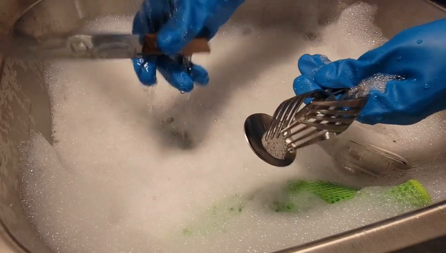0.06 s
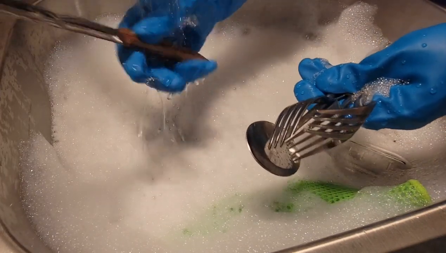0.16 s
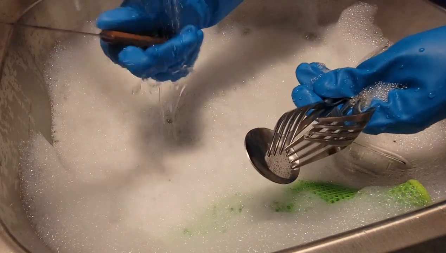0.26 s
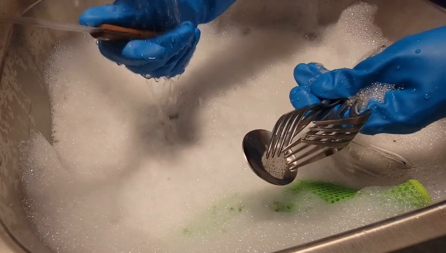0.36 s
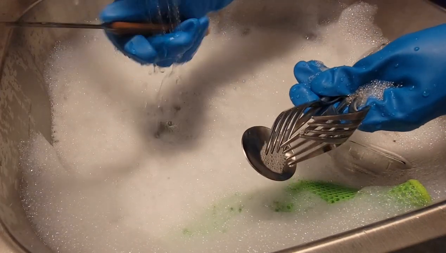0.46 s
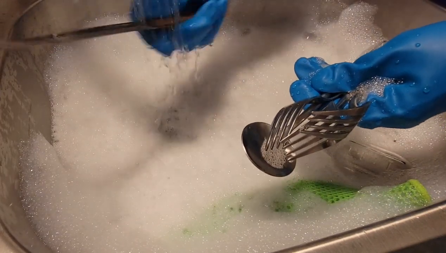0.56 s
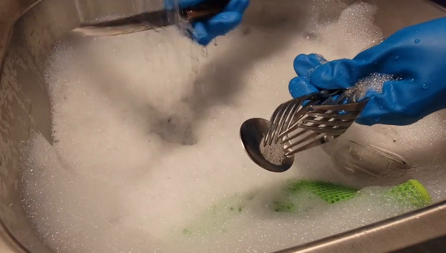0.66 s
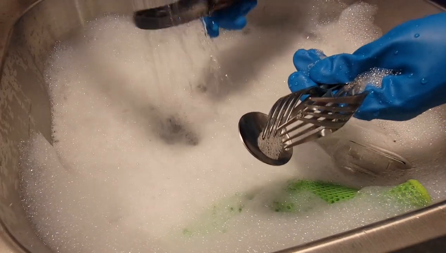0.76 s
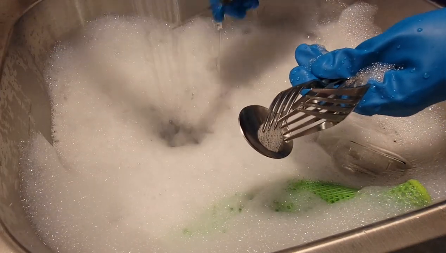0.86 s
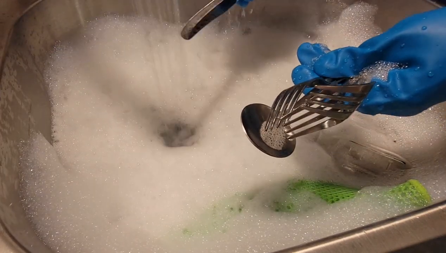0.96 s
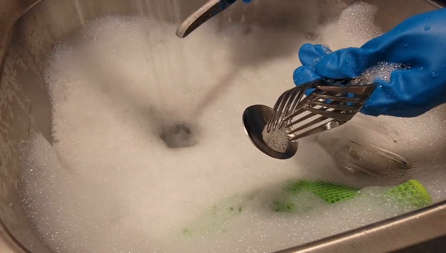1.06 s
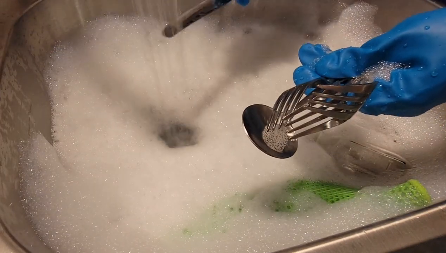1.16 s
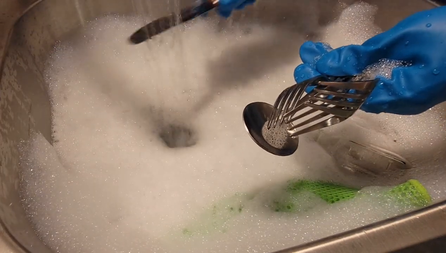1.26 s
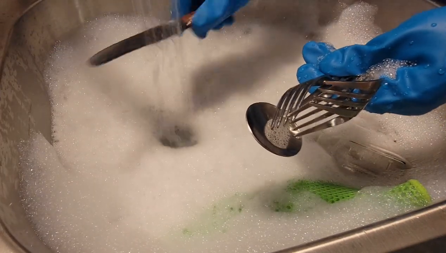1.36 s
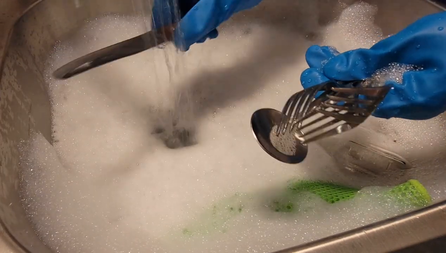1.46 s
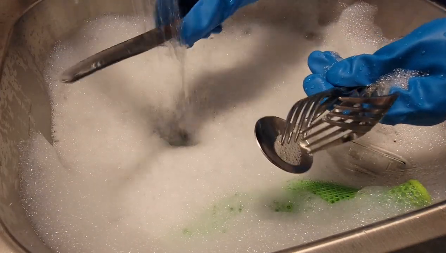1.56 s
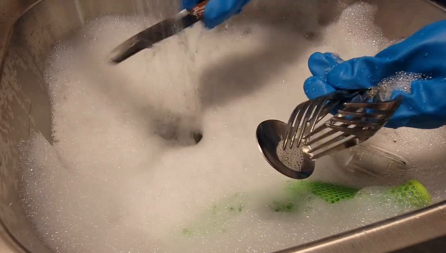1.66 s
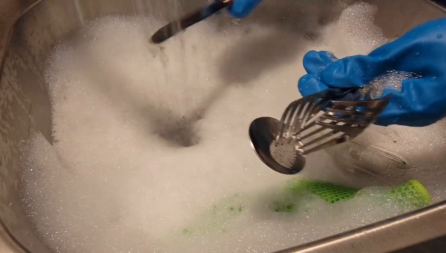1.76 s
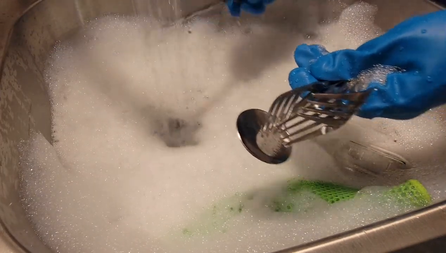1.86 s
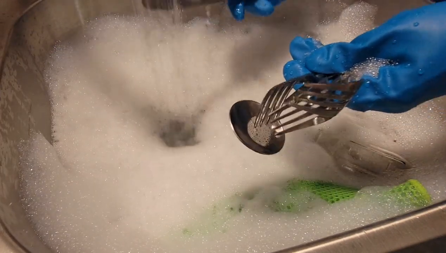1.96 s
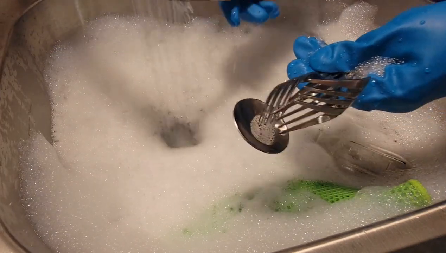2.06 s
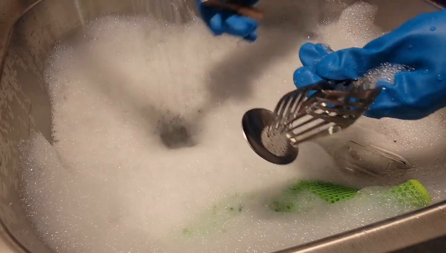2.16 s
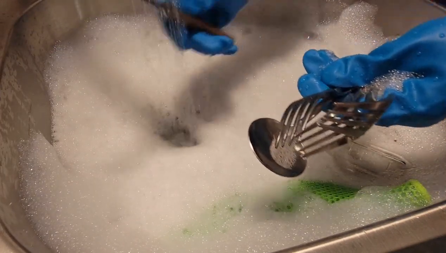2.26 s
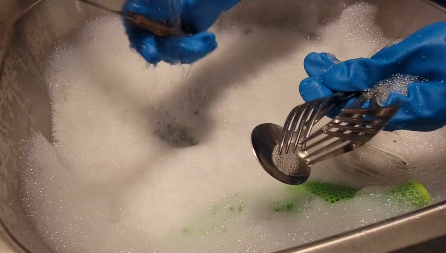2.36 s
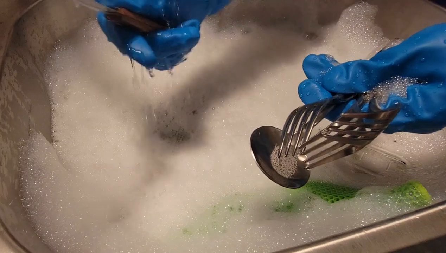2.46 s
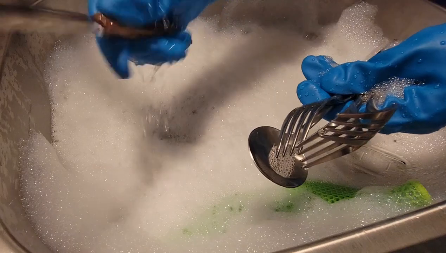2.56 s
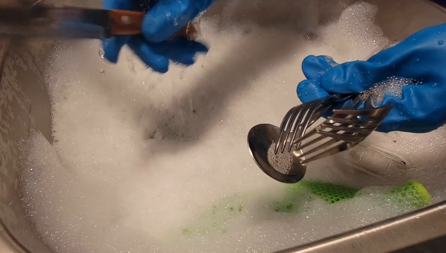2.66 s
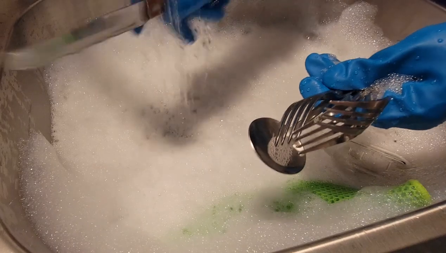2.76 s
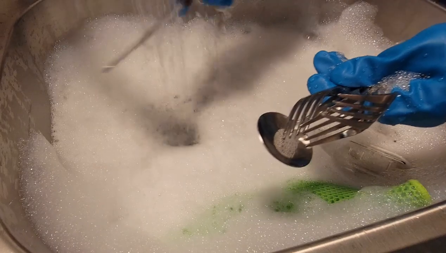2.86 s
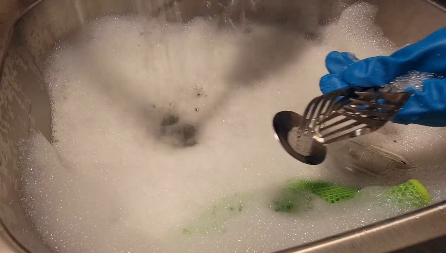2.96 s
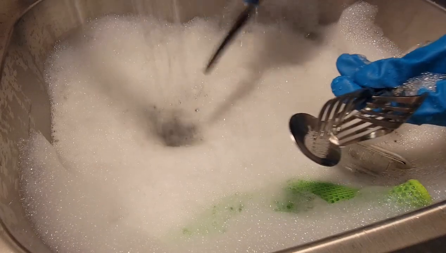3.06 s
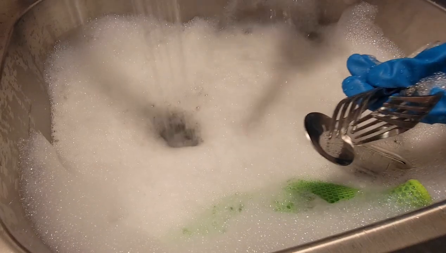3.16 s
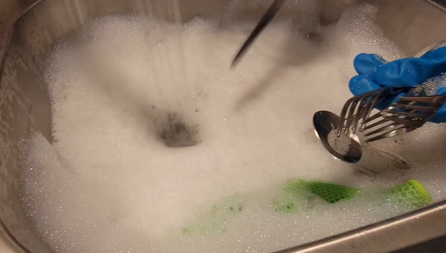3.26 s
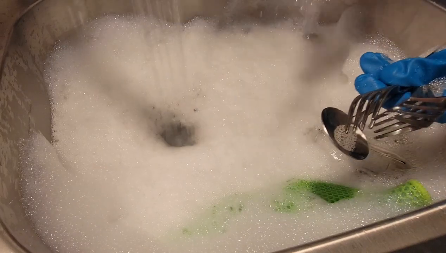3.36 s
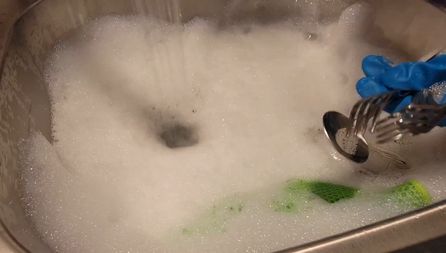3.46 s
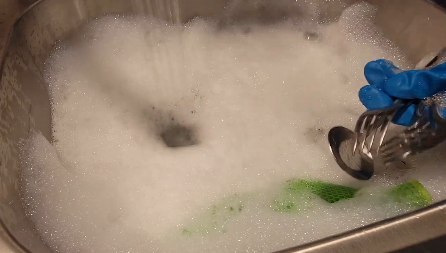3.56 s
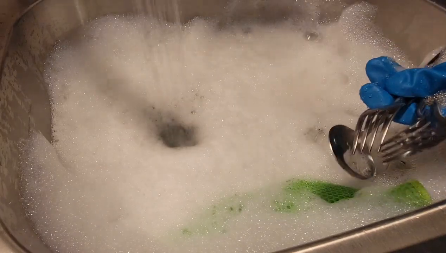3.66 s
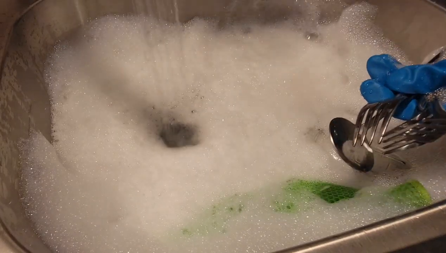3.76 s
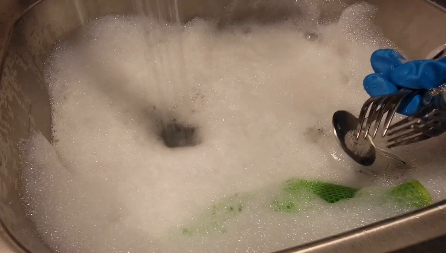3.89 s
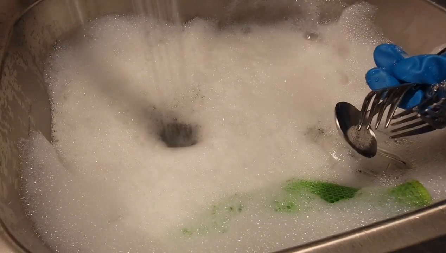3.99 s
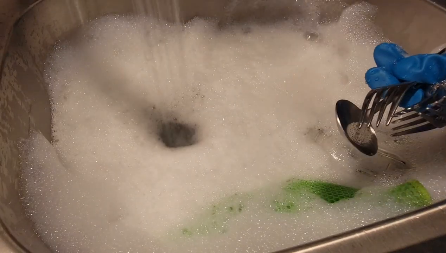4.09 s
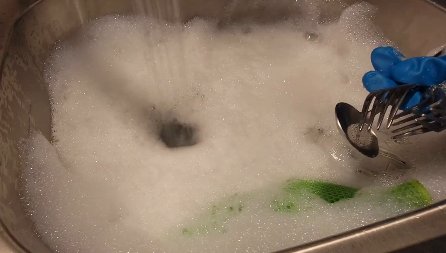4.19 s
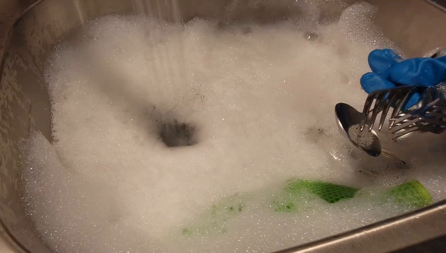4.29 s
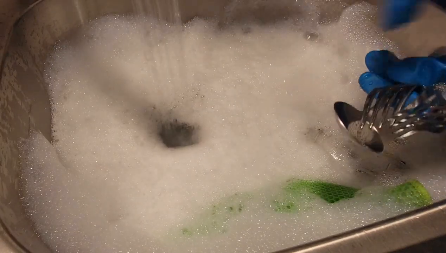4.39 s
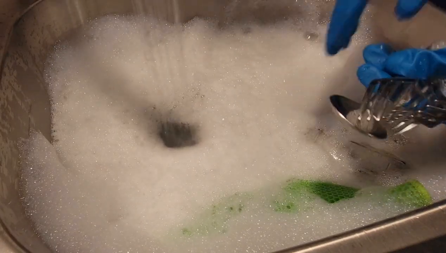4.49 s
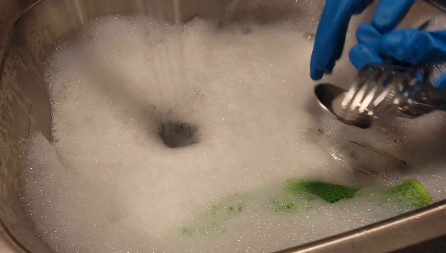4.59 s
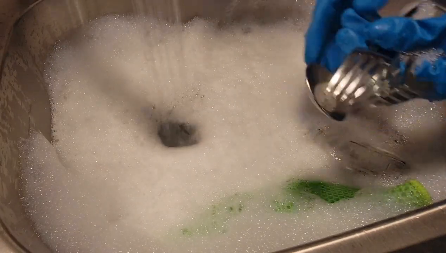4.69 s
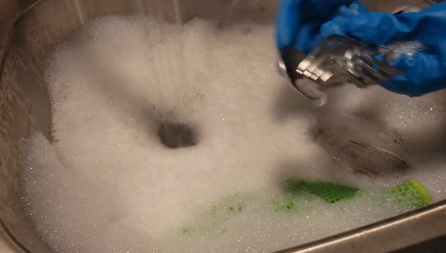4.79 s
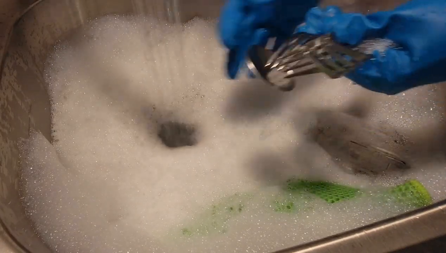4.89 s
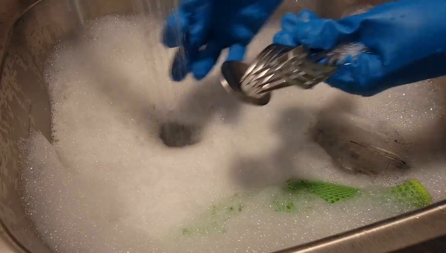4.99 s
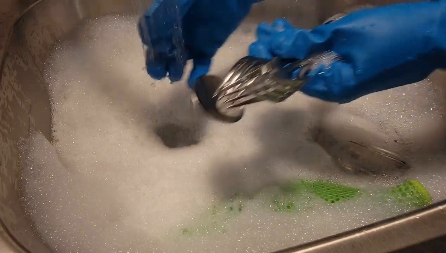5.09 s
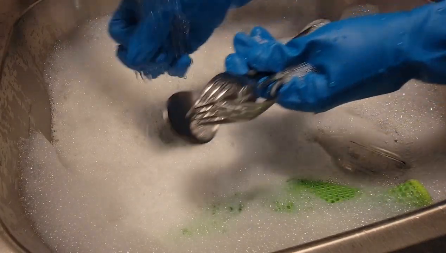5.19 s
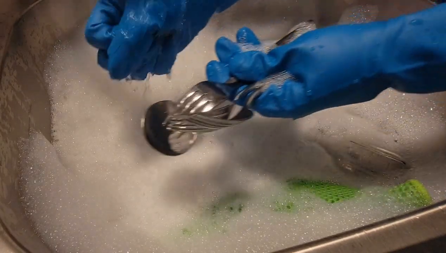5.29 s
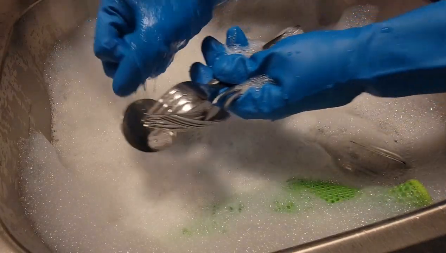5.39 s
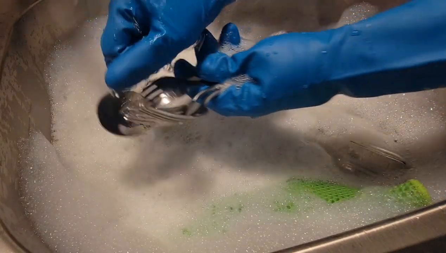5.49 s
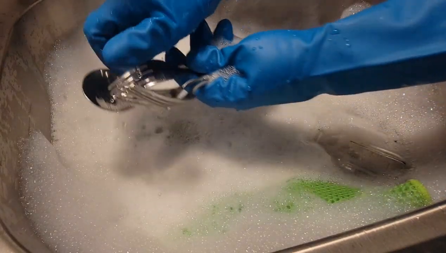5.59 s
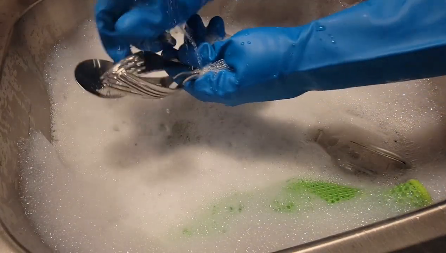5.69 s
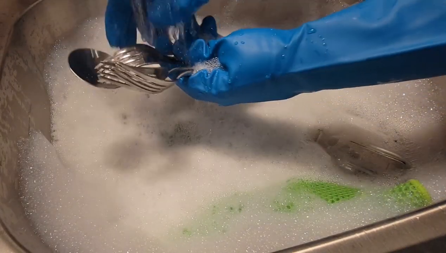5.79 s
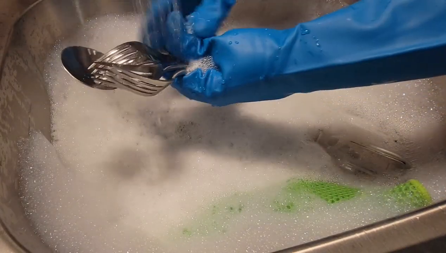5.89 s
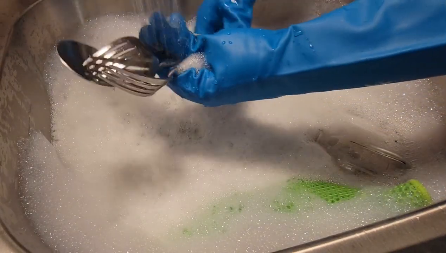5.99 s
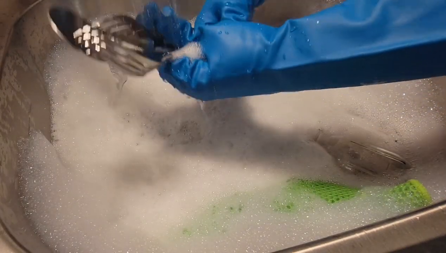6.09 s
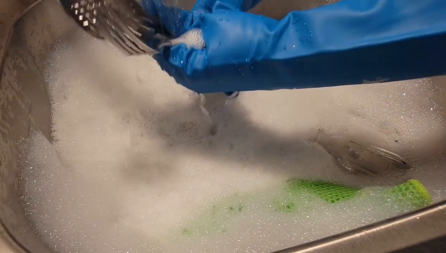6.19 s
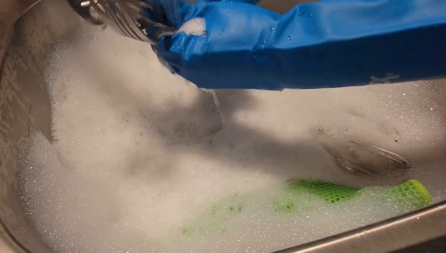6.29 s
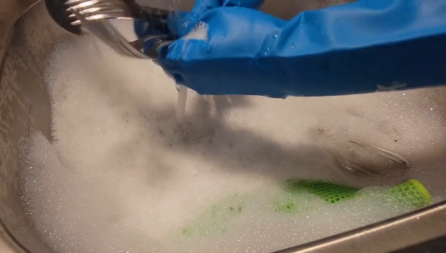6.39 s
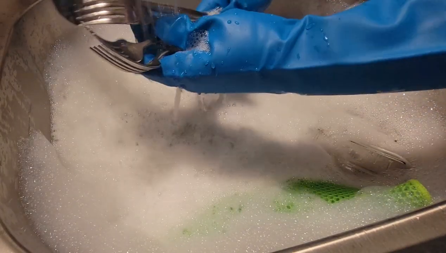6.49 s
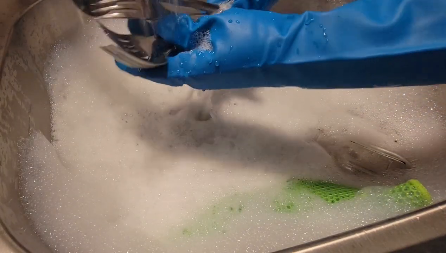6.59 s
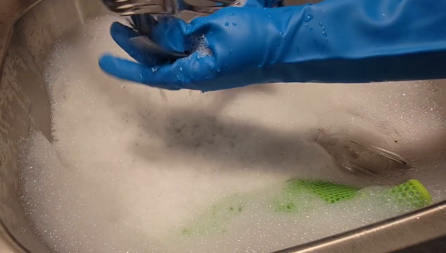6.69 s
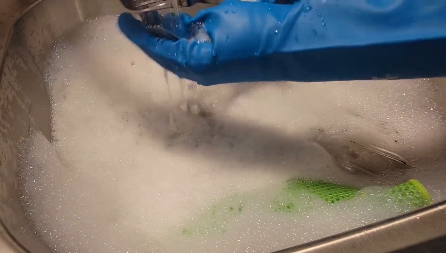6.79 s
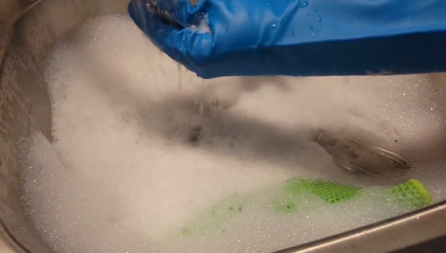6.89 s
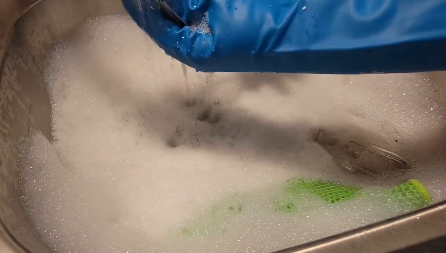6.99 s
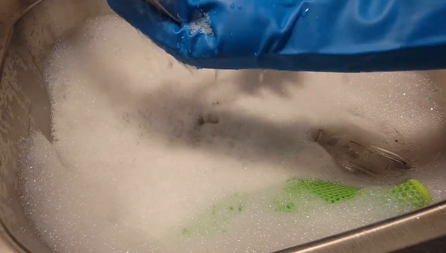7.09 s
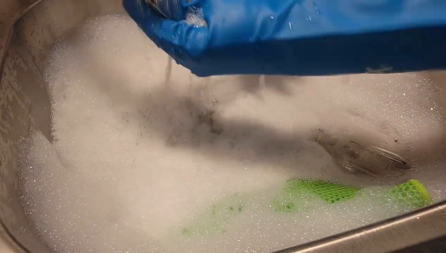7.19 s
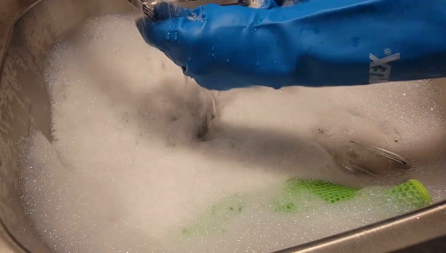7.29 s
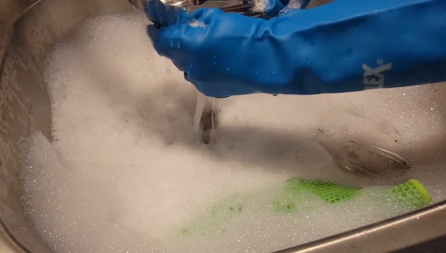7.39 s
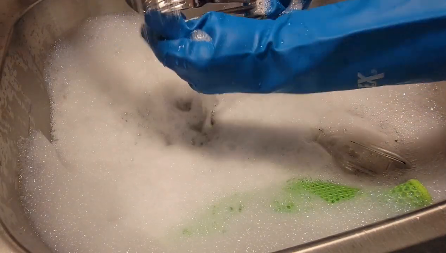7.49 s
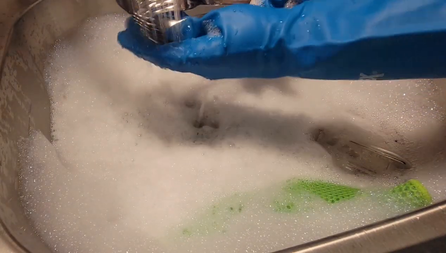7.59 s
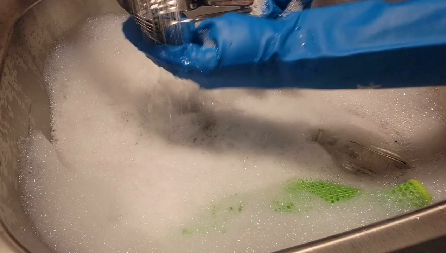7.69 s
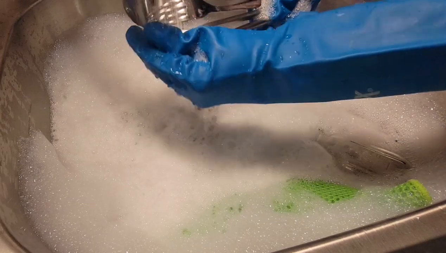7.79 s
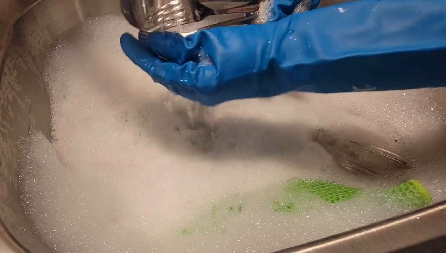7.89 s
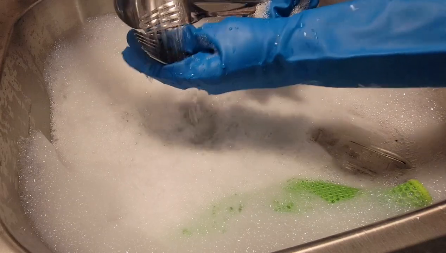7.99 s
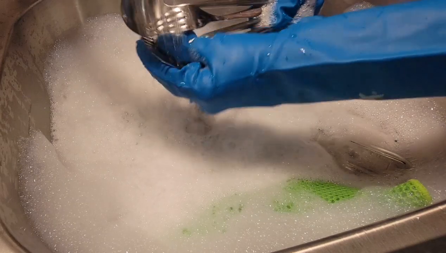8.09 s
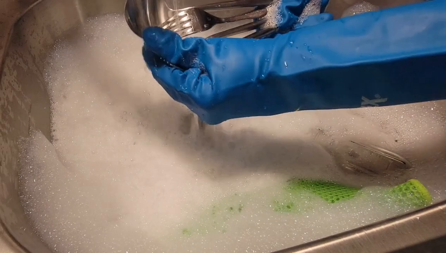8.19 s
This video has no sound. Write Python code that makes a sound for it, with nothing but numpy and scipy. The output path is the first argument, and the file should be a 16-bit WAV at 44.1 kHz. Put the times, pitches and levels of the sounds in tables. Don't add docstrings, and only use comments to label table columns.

```python
import sys
import numpy as np
from scipy import signal
from scipy.fft import rfft, irfft, next_fast_len
from scipy.io import wavfile
from scipy.ndimage import map_coordinates

SR = 44100
rng = np.random.default_rng(int(sys.argv[2]) if len(sys.argv) > 2 else 0)


def master_out(mix):
    frames = np.transpose(np.atleast_2d(mix))
    ceiling = np.clip(frames, -1, 1)
    pcm = np.round(ceiling * 32767).astype(np.int16)
    wavfile.write(sys.argv[1], SR, pcm)


def gain_from_decibels(decibels):
    exponent = np.asarray(decibels, float) / 20
    return 10 ** exponent


N = 363825

# (time [s], impact level [dB], share plunging into suds [0-1])
JET = [(0.0, -53.5, 0.93), (0.14, -57.5, 0.91), (0.77, -58, 0.69), (1.02, -51.5, 0.97), (1.38, -52.5, 1),
       (1.48, -55, 0.98), (1.82, -54.5, 0.88), (2.3, -51.5, 1), (2.44, -55.5, 0.97), (2.57, -59.5, 0.6),
       (2.89, -59.5, 0.7), (2.93, -54, 0.78), (3.35, -50.5, 1), (5.05, -49.5, 1), (5.22, -56, 0.84),
       (5.7, -57.5, 0.7), (6.6, -58.5, 0.82), (8.25, -57, 0.65)]
# (time [s], length [s], spray level [dB])
RINSES = [
    (0.036, 0.11, -59.5),
    (1.95, 0.29, -61.5),
    (3.262, 0.31, -58.5),
    (5.945, 0.62, -57),
    (6.79, 0.096, -65),
    (7.006, 0.3, -61.5),
    (7.692, .18, -59),
    (7.93, .4, -60.5),
]
# (frequency [Hz], width [Hz], level [dB])
POCKET = [(862, 51, -2.5), (987, 22, -8), (1060, 25, -9)]
# (frequency [Hz], width [Hz], level [dB])
THROAT = [(1530, 210, -1.5), (1997, 48, 3), (3260, 140, -7.5)]
# (frequency [Hz], width [Hz], level [dB])
SHALLOW_POCKET = [(1030, 170, 0)]
# (time [s], shallowness [0-1])
SHALLOWNESS = [(0, 0.4), (1.1, 0), (1.6, 1), (2.0, 0.7), (2.3, 0.64), (3.25, 0.9), (3.5, 0.1), (4.3, 0.3),
               (5.0, 0), (5.6, 0.6), (8.25, .5)]
# (frequency [Hz], density [dB/Hz])
SPLASH_SPECTRUM = [(680, -12), (1150, -7), (1210, -8), (1600, -2.5), (2010, -4), (2150, -5.5), (3260, -4),
                   (3550, -7.5), (4250, -10), (5880, -19), (7000, -17), (9100, -105), (15400, -120)]
# (frequency [Hz], density [dB/Hz])
SPRAY_SPECTRUM = [(2650, -9.5), (4500, 0), (5910, -11), (7670, -3), (8360, -7), (8980, -7), (14200, 0),
                  (15800, -0.5), (16200, -48), (16500, -47)]
# (frequency [Hz], difference [dB])
WATER_LEAN = [(400, 2.5), (800, 0), (1500, 4), (3000, -2), (6000, 7), (10000, 9), (15000, 3.5)]
# (time [s], peak
# [dB], pitch [Hz])
GULPS = [(0.922, -34, 930), (3.498, -24, 790), (1.146, -21.5, 1650), (1.33, -31, 1630), (1.895, -29, 1950),
         (4.696, -28, 840), (2.07, -31.5, 910), (2.104, -32, 1100), (2.286, -29, 890), (2.336, -27, 987),
         (3.006, -20.5, 2140), (3.173, -36, 1005), (3.207, -28.5, 1770), (3.277, -28, 1060),
         (3.315, -30, 900), (3.35, -22.5, 870), (4.361, -25.5, 1600), (3.776, -33, 800), (3.833, -26, 2200),
         (4.024, -13, 2630), (4.227, -29, 850), (4.358, -30, 970), (4.451, -27, 953), (4.524, -28.5, 954),
         (4.816, -31, 1640), (4.883, -39, 835), (6.898, -27, 1530), (7.317, -32, 1540), (7.938, -31, 1660),
         (8.027, -31, 1890)]
# (frequency [Hz], T60 [s])
WALLS = [(300, .08), (1500, .05), (6000, .03), (15000, .022)]
# (frequency [Hz], width [Hz], level [dB])
DRONE = [(107, 7.5, -67.5), (220.7, 14, -72.5), (313.3, 33.6, -64)]
# (frequency [Hz], density [dB/Hz])
ROOM_SPECTRUM = [(15, -60), (25, -40), (41, -1), (64, 23), (220, -18.5), (253, -24), (316, -67), (350, 40),
                 (381, -38), (615, -20), (1500, -25), (1950, -81), (3300, -120)]
# (time [s], peak [dB], pitch [Hz])
TICKS = [(0.0298, -38, 11900), (0.3501, -38, 13000), (0.5536, -46, 12800), (0.5771, -45, 12600),
         (0.6085, -34, 12400), (1.2067, -29, 15300), (1.515, -43, 7340), (1.5628, -31, 12300),
         (1.949, -37, 10200), (2.3196, -43, 12400), (2.4049, -39, 9200), (2.5506, -41, 13000),
         (2.9552, -42, 13600), (3.3992, -36, 11700), (3.6616, -41, 13400), (3.8995, -26, 12200),
         (4.1071, -30, 14400), (4.2892, -34, 13900), (4.305, -31, 11700), (4.5336, -27, 13700),
         (4.6648, -33, 13900), (4.7964, -36, 12900), (4.861, -36, 11900), (4.9277, -40, 14700),
         (4.9474, -41, 13900), (4.9774, -34, 9610), (5.1223, -36, 14000), (5.1821, -30, 14700),
         (5.254, -43, 7550), (5.4256, -39, 13500), (5.4909, -40.5, 10300), (5.5523, -53, 11300),
         (5.6655, -56, 12200), (5.7069, -49, 12200), (5.7768, -32, 10200), (5.8411, -49, 13800),
         (5.8601, -47, 12900), (5.8874, -45, 12500), (5.9075, -39, 14100), (5.9604, -42, 13200),
         (6.1574, -33, 13800), (6.1724, -36, 11900), (6.3081, -46, 12800), (6.3305, -34, 14400),
         (6.3614, -39, 7850), (6.3819, -41, 13500), (6.4338, -39, 14000), (6.5665, -38, 11900),
         (6.6159, -42, 12400), (6.7635, -40, 13300), (6.8314, -42, 11700), (7.0249, -43, 7690),
         (7.0728, -40, 11200), (7.1147, -45, 13500), (7.1536, -34, 12100), (7.441, -32, 12700),
         (7.5906, -38, 10200), (7.7184, -36, 13000), (8.0601, -37, 12500), (8.1434, -33, 12500)]
# (time [s], peak [dB], treble [dB], strongest ring [Hz])
CLINKS = [(1.03, -38, -20, 4700), (1.528, -29.5, -28, 7500), (3.256, -30, -28, 3300),
          (4.2903, -31, -16, 7980), (4.452, -29, -30, 3240), (4.5472, -21, -7, 3900),
          (4.665, -29, -25, 4400), (4.758, -26, -5, 7600), (5.094, -31, -14, 2490), (5.278, -28, -25, 7600),
          (5.997, -20.5, -11.5, 5940), (6.055, -25.5, -32, 4530), (6.241, -30, -27, 4300),
          (6.107, -32.5, -26, 4700), (6.281, -31, -30, 7600), (6.328, -30.5, -13, 3870),
          (6.4916, -34, -30, 4200), (6.565, -37, -20, 4400), (6.8828, -27.5, -30, 5130),
          (6.8967, -20.5, -9, 5600), (7.071, -33, -22, 4380), (7.116, -39, -6, 4450),
          (7.318, -26.5, -32, 2240), (7.345, -29.5, -32, 3100), (7.5918, -29.5, -18, 3960),
          (7.68, -31, -22, 4100), (7.736, -31.5, -16, 4100), (8.021, -22.5, -6, 3670),
          (8.055, -27, -26, 4400), (8.1433, -31, -14, 4400), (2.1545, -35, -25, 6750),
          (5.547, -43, -25, 4350), (5.9356, -37, -22, 3600), (6.134, -40, -25, 4640),
          (6.146, -33, -28, 4600), (6.199, -36, -25, 4500), (6.2299, -35.5, -25, 4490),
          (6.3746, -39.5, -25, 4840), (6.5845, -36, -16, 4370), (6.8316, -37.5, -17, 3600),
          (6.8645, -35, -23, 4710), (7.136, -42, -25, 4690), (7.2202, -31, -27, 3160),
          (7.287, -35, -17, 4150), (7.391, -38, -25, 6100), (7.612, -36, -25, 4290),
          (7.7774, -35, -23, 3900), (7.9615, -36, -25, 4520), (8.0877, -31.5, -25, 3770),
          (8.155, -34, -28, 4470)]
# (time [s], peak [dB], treble [dB], strongest ring [Hz])
KNIFE = [
    (3.0051, -30.5, -32, 2610),
    (3.499, -41, -24, 3130),
    (4.0265, -10.5, -16, 2830),
    (4.0713, -14, -30, 3020),
    (4.1075, -23.5, -23, 2930),
    (4.1427, -26, -22, 2300),
    (4.155, -21.5, -26, 4140),
    (4.166, -26, -27, 2290),
]
# (frequency [Hz], level [dB], T60 [s])
HANDLES = [(2250, -6, .1), (2676, 0, .12), (2880, -3, .1), (3241, -6, .07), (3950, -2, .1), (4300, -6, .1),
           (5286, -7, .08), (6207, -5, .05), (7095, -3, .04), (7550, -6, .05), (10010, -9, .06),
           (12230, -6, .06), (14710, -6, .05)]
# (frequency [Hz], width [Hz], level [dB])
TIPS = [(8880, 23, -9.5), (10300, 59, 3.5), (10950, 75, -14), (11200, 31, -2), (12400, 410, -1),
        (13000, 90, -19), (13700, 28, 2), (15200, 36, -4.5)]
# (frequency [Hz], width [Hz], level [dB])
TINES = [(4430, 70, -8), (6070, 63, -6), (6660, 27, -7), (7800, 36, -8), (8800, 75, -9), (10000, 24, -6),
         (11400, 53, -14), (12000, 35, -12), (12500, 31, -13), (14000, 29, -1), (14400, 27, -4),
         (15100, 62, -6)]
# (frequency [Hz], width [Hz], level [dB])
GRIT = [(7600, 3500, -15), (14600, 2500, -24)]
# (time [s], peak [dB], clatter [dB], contact [s])
THUDS = [
    (2.43, -51, -18.5, 0.011),
    (3.502, -8.5, -31.5, 0.0098),
    (3.743, -20.5, -34.5, 0.01),
    (3.938, -45, -25, 0.0065),
    (4.259, -41.5, -15, 0.023),
    (6.08, -47.5, -8.5, 0.0064),
]
# (frequency [Hz], level [dB], T60 [s])
SHEET = [(215, -9, 0.085), (280, 4, 0.1), (342.5, 14.5, 0.1), (388, -12.5, 0.54), (327, 1.5, 0.23),
         (478, -5, 0.19), (491, 1, 0.081), (137, -23.5, 0.34), (620, 5, 0.115), (760, -11, 0.072),
         (890, -9, 0.11), (1318, 1.5, 0.058)]

LAG_S = 6.84 / 44100
SIDES = np.array([[1], [-1]])

GURGLE_DB, GURGLE_SWAY_DB = -0.5, 1
BLOCKED_DB = 38.5
SPRAY_DB, SPRAY_GROWTH = -59.5, 1.56
SHAKE_DB, SHAKE_T60_S = -29, 0.32
SLOSH_DB, SHUDDER_DB, SHUDDER_T60_S = -66, -31, 0.53
STIR_S, STIR_LENGTH_S, STIR_DB = 5.7, 0.64, -63
RINSE_EDGE_S, GULP_T60_S = 0.046, 0.032

MAINS_HZ, MAINS_DB, MAINS_SWAY_DB = 59.5, -59.2, 2.2
SAG_S, SAG_LENGTH_S, SAG_DB = 4.36, 0.1, -9

TICK_T60_S, TICK_WIDTH_HZ, TICK_PAN_DB = 0.0023, 4400, 6
KNIFE_PAN_DB, KNIFE_HOLD_S, KNIFE_RING_DB = -9.5, 0.011, 5
HAND_PAN_DB, HAND_HOLD_S = 2.5, 0.005
RATTLE_T60_S, RISE_S = 0.046, 0.00085
SNAP_GAIN, SNAP_S = 2.5, 0.002
TIP_WIDTH_HZ, TIP_DB = 50, 11.5
SLIDE_S, SLIDE_DB = 5.27, -42
SLIDE_ATTACK_S, SLIDE_HOLD_S, SLIDE_T60_S = 0.012, 0.062, 0.12


def seconds(count=N):
    return np.arange(count) / SR


def unit(x):
    return x / np.sqrt(np.mean(x ** 2) + 1e-20)


def peaked(x):
    return x / np.abs(x).max()


def along(points, hz):
    f, v = np.transpose(points)
    return np.interp(np.log(hz + 1), np.log(f + 1), v)


def curves(rows):
    s, *cols = np.transpose(rows)
    return [np.interp(seconds(), s, c) for c in cols]


def wobble(rate_hz):
    knots = rng.standard_normal(int(N * rate_hz / SR) + 4)
    return map_coordinates(knots, [seconds() * rate_hz])


def filtered(x, response):
    m = next_fast_len(x.shape[-1] + 2048, real=True)
    return irfft(rfft(x, m) * response(np.fft.rfftfreq(m, 1 / SR)), m)[..., :x.shape[-1]]


def resonant(modes):
    def response(f):
        return sum((-1) ** k * gain_from_decibels(db) * 1j * f * w / (c * c - f * f + 1j * f * w)
                   for k, (c, w, db) in enumerate(modes))
    return response


def place(out, s, sound):
    start = round(s * SR)
    out[..., start:start + sound.shape[-1]] += sound


def lagged(x):
    return filtered(x, lambda f: np.exp(1j * np.pi * f * LAG_S * SIDES))


def basin(x, wet, pan_db):
    hz, t, z = signal.stft(rng.standard_normal((2, SR // 16)), SR, nperseg=64)
    decay = gain_from_decibels(-60 * t / along(WALLS, hz)[:, None])
    tail = signal.istft(z * decay, SR, nperseg=64)[1]
    echo = signal.fftconvolve(x[None], tail / np.linalg.norm(tail[0]), axes=1)[:, :len(x)]
    return gain_from_decibels(pan_db / 2 * SIDES) * (np.sqrt(1 - wet) * lagged(x) + np.sqrt(wet) * echo)


def wandering(x, wet, size):
    out = np.zeros((2, N + 6 * size))
    fade = np.hanning(size + 1)[:-1]
    x = np.pad(x, size)
    for i in range(0, N + size, size // 2):
        stretch = x[i:i + size] * fade[:len(x) - i]
        stretch = np.pad(stretch, (0, 3 * size))[:3 * size]
        out[:, i:i + 3 * size] += basin(stretch, wet, 0)
    return out[:, size:size + N]


def ports(alike):
    noise = rng.standard_normal((3, N))
    return np.sqrt(alike) * lagged(noise[0]) + np.sqrt(1 - alike) * noise[1:]


def bubbles(count, hz, spread, cycles, scatter_db, rise, size):
    when, pitch = rng.random(count), rng.standard_normal(count)
    luck = np.minimum(rng.exponential(1, count), 4)
    turns = np.clip(hz * np.exp(spread * pitch), 200, 17000)[:, None] * seconds(size)
    envelope = np.exp(-turns / cycles) * (1 - np.exp(-3 * turns))
    grain = np.sin(2 * np.pi * turns * (1 + rise * turns / cycles)) * envelope
    grain = grain * gain_from_decibels(scatter_db * luck)[:, None]
    where = (when * N).astype(int)[:, None] + np.arange(size)
    return unit(np.bincount(where.ravel(), grain.ravel(), N + size)[:N])


def flat(x):
    return unit(filtered(x, lambda f: 1 / np.sqrt(np.interp(f, *signal.welch(x, SR, nperseg=256)) + 1e-9)))


def after(events, t60_s):
    t = seconds()
    return sum(gain_from_decibels(2 * (db - 60 * np.abs(t - s) / t60_s)) * (t > s) for s, db, *_ in events)


def rinsing():
    t = seconds()
    return sum(gain_from_decibels(2 * db) * np.clip(np.minimum(t - s, s + length - t) / RINSE_EDGE_S, 0, 1)
               for s, length, db in RINSES)


def flow():
    impact_db, plunge = curves(JET)
    gurgle_db = impact_db + GURGLE_DB - BLOCKED_DB * (1 - plunge) + GURGLE_SWAY_DB * wobble(13)
    shaken = gain_from_decibels(2 * SHAKE_DB) * after(KNIFE + CLINKS, SHAKE_T60_S) + rinsing()
    splash = gain_from_decibels(2 * impact_db) + gain_from_decibels(2 * -2.5) * shaken
    jet_spray_db = SPRAY_DB + SPRAY_GROWTH * (impact_db + 54) + 2.2 * wobble(5.705)
    spray = gain_from_decibels(2.004 * jet_spray_db) + shaken
    slosh = gain_from_decibels(1.927 * (SLOSH_DB + 1.5 * wobble(5.1))) + gain_from_decibels(2 * SHUDDER_DB) * after(THUDS, SHUDDER_T60_S)
    stir = np.exp(-((seconds() - STIR_S) / STIR_LENGTH_S) ** 2)
    slosh = slosh + gain_from_decibels(1.97 * (STIR_DB + 2.5 * wobble(8))) * stir
    return gurgle_db, 10 * np.log10(splash), 10 * np.log10(spray), 10 * np.log10(slosh)


def layer(grain, db, colour, alike):
    grains = gain_from_decibels(db) * unit(filtered(flat(grain), colour))
    rush = gain_from_decibels(db + 1.1) * unit(filtered(ports(alike), colour))
    return grains, rush


def hollow(gurgle_db, patter, shallow):
    gulp = bubbles(count=3500, hz=920, spread=0.15, cycles=1.5, scatter_db=2.5, rise=0.03, size=300)
    pocket, mouth = resonant(POCKET), resonant([(890, 330, 0)])
    db = gurgle_db + 2.2 * patter - 4.0 - 6.1 * shallow
    return layer(gulp, db, lambda f: pocket(f) * mouth(f), alike=0.8)


def throat(gurgle_db, patter):
    glugs = bubbles(count=1200, hz=1914, spread=0.24, cycles=1.5, scatter_db=3.5, rise=0.032, size=300)
    return layer(glugs, gurgle_db + 3.7 * patter - 8.0, lambda f: resonant(THROAT)(f) ** 2, alike=0.7)


def splash(splash_db, patter):
    drops = bubbles(count=5000, hz=2223, spread=0.483, cycles=2.3, scatter_db=0.0, rise=0.039, size=300)
    return layer(drops, splash_db + 0.5 * patter - 1.0, lambda f: gain_from_decibels(along(SPLASH_SPECTRUM, f)), alike=0.5)


def spray(spray_db, patter):
    foam = bubbles(count=9000, hz=9100, spread=0.6, cycles=1.5, scatter_db=5.5, rise=0.028, size=60)
    return layer(foam, spray_db + 1.22 * patter + 3.0, lambda f: gain_from_decibels(along(SPRAY_SPECTRUM, f)), alike=0.25)


def water():
    gurgle_db, splash_db, spray_db, slosh_db = flow()
    surge_db, patter = 0.6 * wobble(9), 1.2 * wobble(90)
    shallow = curves(SHALLOWNESS)[0]
    layers = [hollow(gurgle_db + surge_db, patter, shallow), throat(gurgle_db + surge_db, patter),
              splash(splash_db + surge_db, patter), spray(spray_db + surge_db, patter)]
    caught = np.clip((splash_db - gurgle_db) / 11.7, 0, 1)
    pings = bubbles(count=800, hz=4400, spread=0.175, cycles=5, scatter_db=4, rise=0, size=500)
    grains = gain_from_decibels(spray_db - 1.5) * caught * pings + sum(g for g, _ in layers)
    slosh = unit(filtered(ports(0.02), lambda f: resonant([(490, 170, 0)])(f) ** 2))
    both = gain_from_decibels(slosh_db - 1.0 + 1.8 * wobble(25)) * slosh + sum(rush for _, rush in layers)
    shallow_rush = unit(filtered(ports(1.0), lambda f: resonant(SHALLOW_POCKET)(f) ** 2))
    both = both + gain_from_decibels(gurgle_db + surge_db + 1.5 * patter - 5.0) * shallow * shallow_rush
    both = both + wandering(grains, wet=0.75, size=8192) + basin(gulps(), wet=0.57, pan_db=0.5)
    return filtered(both, lambda f: gain_from_decibels(along(WATER_LEAN, f) / 2 * SIDES))


def kitchen():
    noise = rng.standard_normal((3, N))
    near = noise[0] + 0.45 * noise[1:]
    drone = sum(gain_from_decibels(db) * unit(filtered(near, resonant([(hz, width, 0)]))) for hz, width, db in DRONE)
    sag_db = SAG_DB * np.exp(-((seconds() - SAG_S) / SAG_LENGTH_S) ** 2)
    mains_db = MAINS_DB + MAINS_SWAY_DB * wobble(3.7) + sag_db + 4.5
    mains = gain_from_decibels(mains_db) * np.sin(2 * np.pi * MAINS_HZ * seconds() + 0.25 * wobble(12))
    rumble = unit(filtered(near, lambda f: gain_from_decibels(np.minimum(along(ROOM_SPECTRUM, f), -12))))
    return mains + drone + gain_from_decibels(-66) * rumble


def ticks():
    out, t = np.zeros((2, N + SR)), seconds(SR // 40)
    for s, db, hz in TICKS:
        crack = rng.standard_normal(len(t)) * gain_from_decibels(-60 * t / TICK_T60_S)
        crack = filtered(crack, lambda f: resonant([(hz, TICK_WIDTH_HZ, 0)])(f) ** 2)
        spit = basin(crack, wet=0.8, pan_db=TICK_PAN_DB)
        place(out, s, gain_from_decibels(db - 1.0) * spit / np.abs(spit.mean(axis=0)).max())
    return out[:, :N]


def gulps():
    out, t = np.zeros(N + SR), seconds(SR // 8)
    for s, db, hz in GULPS:
        swell = gain_from_decibels(db - 6.0 - 60 * t * hz / 900 / GULP_T60_S) * (1 - np.exp(-t / 0.00047))
        place(out, s, swell * np.sin(2 * np.pi * hz * t * (0.982 + 0.61 * t)))
    return out[:N]


def rattle(hard, hold_s):
    t = seconds(35 * 160)
    bounces = gain_from_decibels(3.5 * np.repeat(rng.standard_normal(160), 35))
    rise = 1 - np.exp(-t / (RISE_S * (1.05 - hard)))
    snap = 1 + SNAP_GAIN * hard ** 2 * np.exp(-t / SNAP_S)
    decay = gain_from_decibels(-60 * np.maximum(t - hold_s * hard, 0) / (RATTLE_T60_S * (1 + 0.78 * hard)))
    return rng.standard_normal(len(t)) * bounces * rise * snap * decay


def clink(db, treble_db, hz, hold_s, ring_db):
    hard = np.clip((db + 31) / 22, 0, 1)
    crack = rattle(hard, hold_s)
    handles = resonant([(c, 60 + 9 / t60_s, level + 16 * hard - 6 + ring_db * (c < 3000))
                        for c, level, t60_s in HANDLES if c < 8500])
    tips = resonant([(c, TIP_WIDTH_HZ, level + TIP_DB - ring_db + rng.normal(0, 3)) for c, _, level in TIPS])
    broad = resonant([(3300, 4000, 12 * hard - 3.5)])
    favoured = resonant([(hz, 300, 11 - 5 * hard)])
    treble = resonant([(11500, 11000, 0)])
    body = filtered(crack, lambda f: broad(f) * f ** 2 / (f ** 2 + 1900 ** 2) + favoured(f) + handles(f))
    edge = filtered(crack, lambda f: treble(f) ** 2 + tips(f))
    return gain_from_decibels(db - 4.5) * (peaked(body) + gain_from_decibels(treble_db + 12.0) * peaked(edge))


def slide():
    corners_s = SLIDE_S + np.cumsum([0, SLIDE_ATTACK_S, SLIDE_HOLD_S, SLIDE_T60_S])
    swell_db = np.interp(seconds(), corners_s, [-2, 1.0, -4.5, -71], left=-90)
    rub = gain_from_decibels(swell_db + SLIDE_DB + 1.5 * wobble(200)) * rng.standard_normal(N)
    tines = resonant([(c, 1.3 * w, db - 2.5 * (c < 13000)) for c, w, db in TINES] + GRIT)
    steady = np.std(filtered(rng.standard_normal(N), tines))
    return basin(filtered(rub, tines) / steady, wet=1.0, pan_db=5.5)


def cutlery():
    out = np.zeros((2, N + SR))
    for rows, pan_db, hold_s, ring_db in [(CLINKS, HAND_PAN_DB, HAND_HOLD_S, 0),
                                          (KNIFE, KNIFE_PAN_DB, KNIFE_HOLD_S, KNIFE_RING_DB)]:
        for s, db, treble_db, hz in rows:
            hit = clink(db, treble_db, hz, hold_s, ring_db)
            place(out, s, basin(hit, wet=0.54, pan_db=pan_db))
    return out[:, :N] + slide()


def drainer():
    out, t = np.zeros((2, N + SR)), seconds(SR // 2)
    handle = resonant([(1060, 4400, 6.1), (3100, 1370, 10.8), (4400, 230, 9.4)])
    for s, db, clatter_db, contact_s in THUDS:
        upper = gain_from_decibels(0.5 * (clatter_db + db + 52.0)) * np.array([[-0.6], [1.3]])
        ring = 0
        for k, (hz, level_db, t60_s) in enumerate(SHEET):
            mode = gain_from_decibels(level_db - 60 * t / t60_s) * np.sin(2 * np.pi * hz * t)
            ring = ring + (-1) ** k * (upper if hz > 450 else 1) * mode
        ring = ring * (1 - np.exp(-(t / contact_s) ** 2))
        chatter = filtered(rng.standard_normal(len(t)) * gain_from_decibels(-60 * t / 0.17), handle)
        clatter = basin(peaked(chatter), wet=0.99, pan_db=-1.5)
        hit = peaked(ring) + gain_from_decibels(clatter_db + 20.0) * clatter
        place(out, s - 0.005, gain_from_decibels(db + 0.5 + 0.7 * SIDES) * hit)
    return out[:, :N]


def scene():
    return water() + kitchen() + ticks() + cutlery() + drainer()


def band_limit(x):
    return signal.sosfilt(signal.butter(12, 16980, fs=SR, output="sos"), x)


def record(dry):
    mix = filtered(dry, lambda f: gain_from_decibels(np.where(f < 16000, 0, -40)))
    return band_limit(mix)


dry = scene()
out = record(dry)
master_out(out)
```